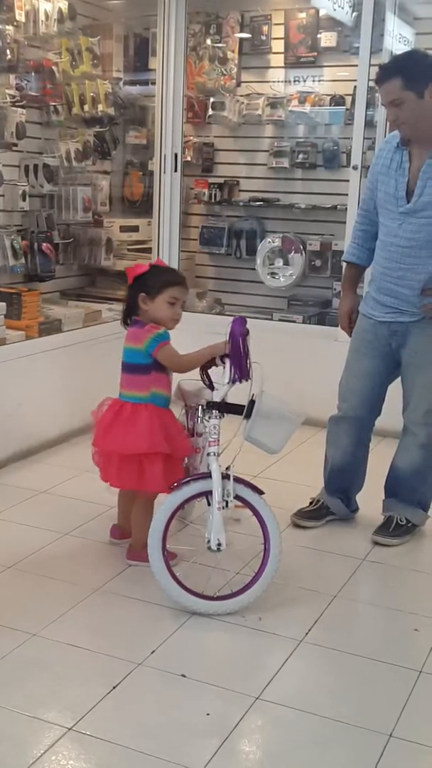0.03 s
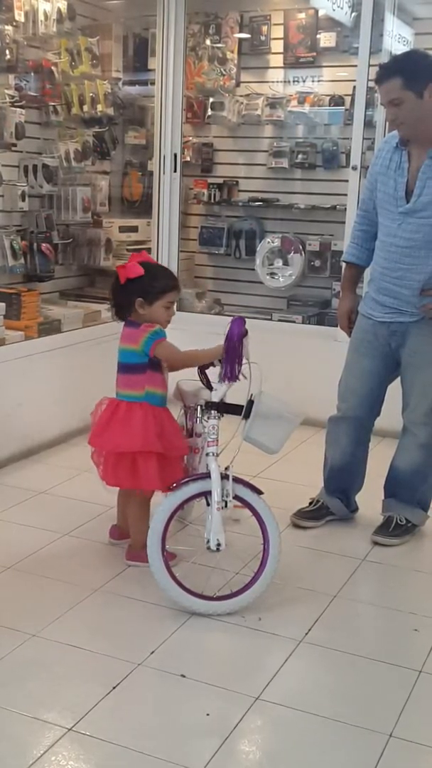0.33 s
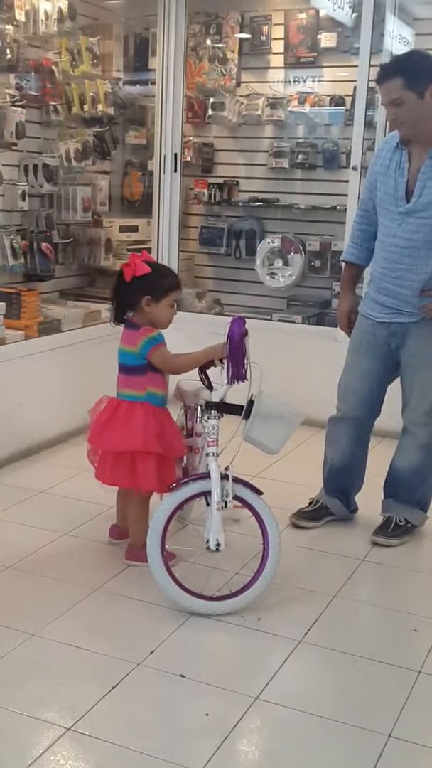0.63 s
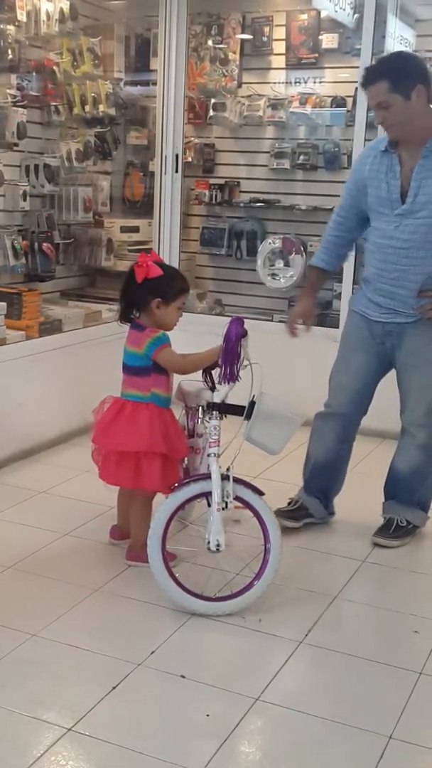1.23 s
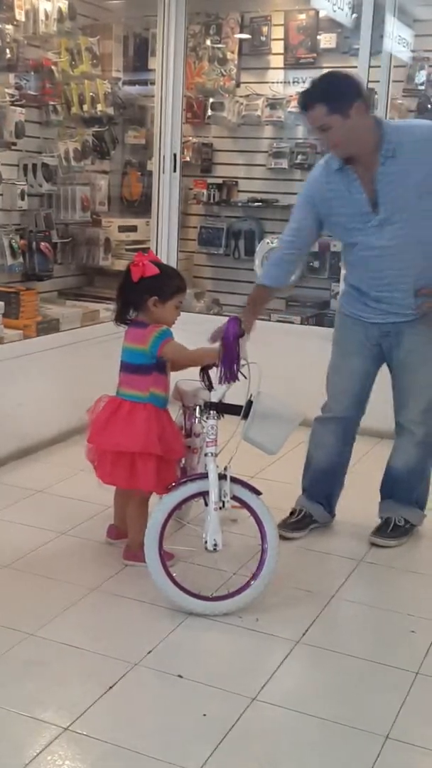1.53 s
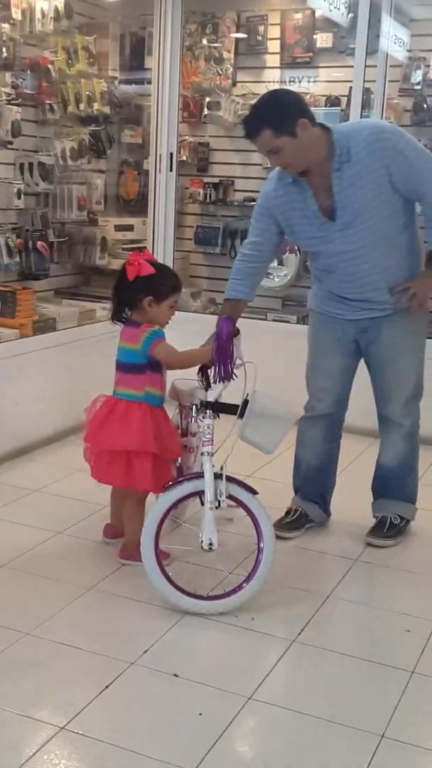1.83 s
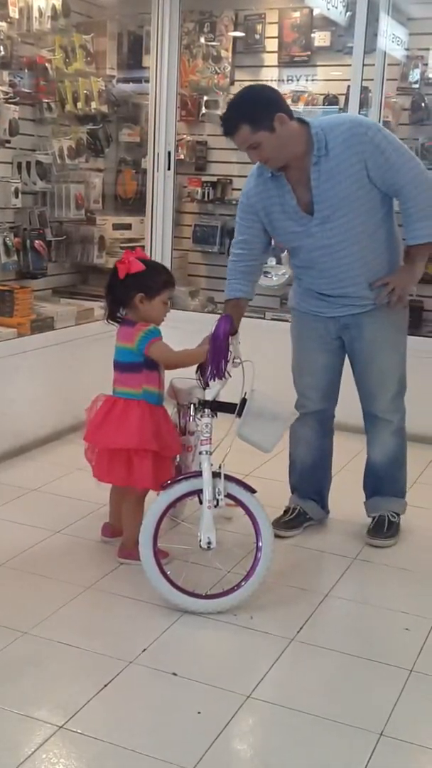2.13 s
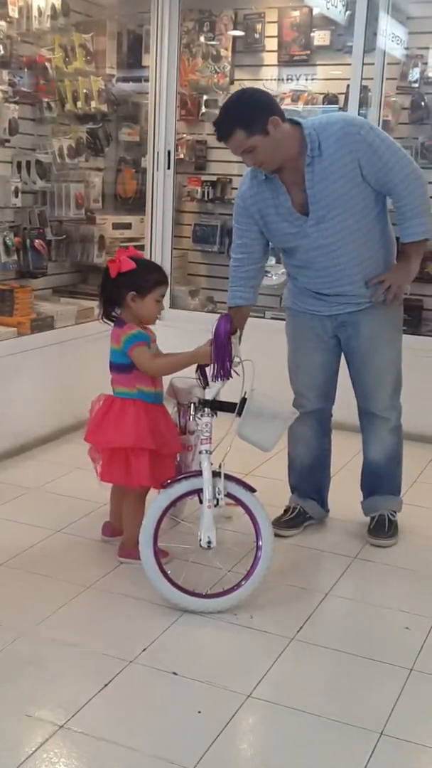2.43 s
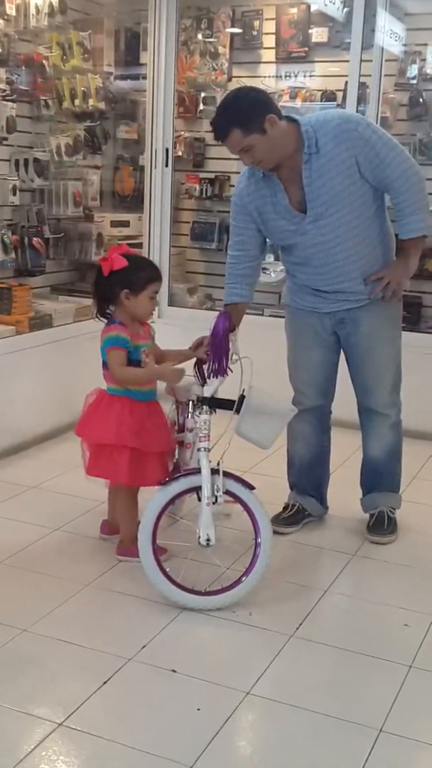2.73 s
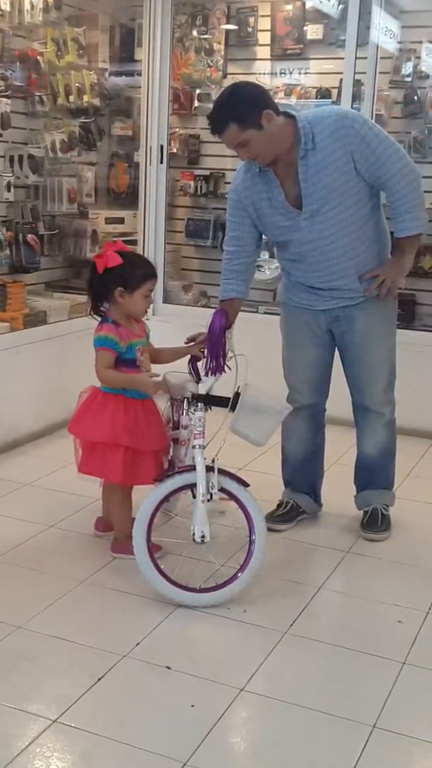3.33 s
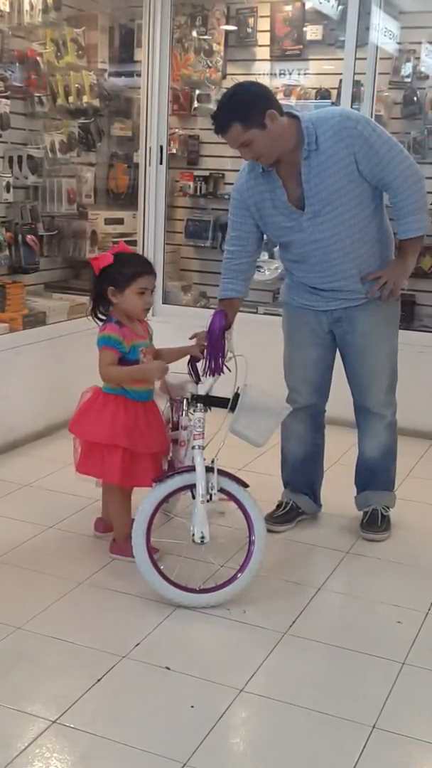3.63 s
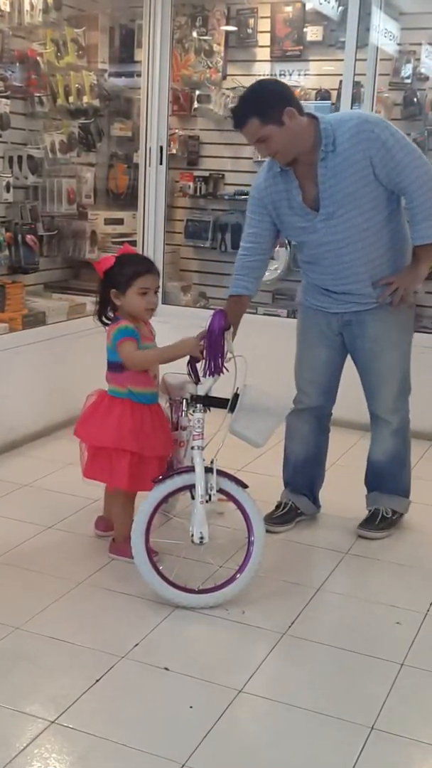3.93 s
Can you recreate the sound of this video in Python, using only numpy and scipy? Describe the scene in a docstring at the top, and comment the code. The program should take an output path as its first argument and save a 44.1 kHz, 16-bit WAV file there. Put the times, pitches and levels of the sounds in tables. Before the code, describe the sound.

A bicycle bell's lever clacks a few times over steady ventilation in a tiled shop. Then the bell gives two quick, bright rings with clattering gears, and its tone lingers while the background hum turns quieter.

```python
"""Bicycle bell in a tiled shop

Ventilation rumbles and hums throughout. The lever of a small rotary bell clacks a few times, then
the bell is rung twice: whirling hammers strike the steel dome in quick runs over a clatter of gears.
An automatic gain control turns everything down once the bell rings."""
import sys
import numpy as np
from scipy import signal
from scipy.fft import rfft, irfft
from scipy.io import wavfile

SR = 44100
rng = np.random.default_rng(int(sys.argv[2]) if len(sys.argv) > 2 else 0)


def transcribe(u):
    """Save the signal u as a 16-bit wav file named by the first command-line argument.

    u: samples, shape (n,) or (channels, n), limited to [-1, 1]; the rate is SR.
    q: integer samples, one column per channel.
    """
    v = np.clip(np.atleast_2d(u).T, -1, 1)
    q = np.round(v * 32767).astype(np.int16)
    wavfile.write(sys.argv[1], SR, q)


N = 176400
TIME = np.arange(N) / SR


def from_db(db):
    """Decibels to gain."""
    return 10 ** (np.asarray(db) / 20)


def at_hz(points, hz):
    """Read a table on a log-frequency axis."""
    freqs, values = np.transpose(points)
    return np.interp(np.log(np.maximum(hz, 1)), np.log(freqs), values)


def pan(lean_db):
    """Constant-power stereo gains; a positive lean is to the left."""
    gains = from_db(np.array([[.5], [-.5]]) * lean_db)
    return gains / np.sqrt(np.mean(gains ** 2, axis=0))


def smooth(x, seconds):
    """One-pole average."""
    pole = np.exp(-1 / (seconds * SR))
    return signal.lfilter([1 - pole], [1, -pole], x)


def drift(rate_hz):
    """Slow random wander, spread 1."""
    slow = irfft(rfft(rng.standard_normal(N)) / (1 + (np.fft.rfftfreq(N, 1 / SR) / rate_hz) ** 2))
    return slow / slow.std()


def waver(rate_hz):
    """Complex wander that moves a tone's level and phase."""
    return drift(rate_hz) + 1j * drift(rate_hz)


def impulses(starts, sizes):
    """Impulses of given sizes at given times."""
    return np.bincount((starts * SR).astype(int), sizes, N)[:N]


def ring_down(starts, db, t60):
    """Amplitude of something that gains energy at each blow and loses it steadily."""
    retained = from_db(-60 / (t60 * SR)) ** 2
    energy = signal.lfilter([1], [1, -retained], impulses(starts, from_db(db) ** 2) + 1e-18)
    return np.sqrt(energy)


def colour(x, spectrum, lean):
    """Minimum-phase EQ with a left-right lean."""
    hz = np.fft.rfftfreq(2 * N, 1 / SR)
    cepstrum = irfft(np.log(from_db(at_hz(spectrum, hz)) * pan(at_hz(lean, hz))))
    cepstrum[:, 1:N] *= 2
    cepstrum[:, N + 1:] = 0
    return irfft(rfft(x, 2 * N) * np.exp(rfft(cepstrum)))[:, :N]


# Tone of the moving air. Each row: frequency in Hz, relative level in dB.
AIR_EQ = [(15, -49), (25, -24.5), (146, -2), (237, -1), (637, -11), (709, -5), (790, -11), (1460, -12.5),
          (1580, -14.5), (1960, -14), (2630, -16.5), (6200, -17.5), (8550, -28), (13800, -46), (15000, -28)]
# Its stereo width. Each row: frequency in Hz, left-right correlation.
AIR_LIKENESS = [(130, 0.98), (290, 0.92), (640, 0.45), (1400, 0), (3000, 0)]
# Its balance. Each row: frequency in Hz, leftward lean in dB.
AIR_LEAN = [(100, 1.5), (700, 0.5), (1300, 5.5), (2400, 9.5), (6000, 11.5), (8300, 0), (12000, -13)]
# Fan tones. Each row: pitch in Hz, level in dB.
FAN_TONES = [(145, -48.5), (683.5, -47), (722, -51), (2573, -58.5), (2729, -56.5)]


def ventilation():
    """Steady air noise, nearly mono in the bass, with wavering fan tones."""
    hz = np.fft.rfftfreq(N, 1 / SR)
    mid, side = rfft(rng.standard_normal((2, N)))
    alike = at_hz(AIR_LIKENESS, hz)
    stereo = mid + np.sqrt((1 - alike) / (1 + alike)) * side * [[1], [-1]]
    air = irfft(stereo * from_db(at_hz(AIR_EQ, hz)) * pan(at_hz(AIR_LEAN, hz)))
    out = from_db(-36.5) * air / air.mean(axis=0).std()
    for tone_hz, db in FAN_TONES:
        wobble = 1 + .43 * waver(rate_hz=1.33)
        out += from_db(db) * np.real(wobble * np.exp(2j * np.pi * tone_hz * TIME))
    return out


# Decay of the room. Each row: frequency in Hz, t60 in seconds.
ROOM_T60 = [(1000, 0.95), (5000, 1), (9000, 0.5), (14000, 0.32)]


def shop_reverb(x, build_s=.005):
    """Diffuse reflections off the tiles, dying faster in the treble."""
    t, tail = TIME[:SR], 0
    edges = np.geomspace(500, 18000, 9)
    for low, high in zip(edges, edges[1:]):
        bandpass = signal.butter(2, [low, high], "band", fs=SR, output="sos")
        band = signal.sosfilt(bandpass, rng.standard_normal((2, SR)))
        tail += band * from_db(-60 * t / at_hz(ROOM_T60, np.sqrt(low * high)))
    tail *= 1 - np.exp(-t / build_s)
    tail /= np.sqrt(np.sum(tail ** 2, axis=1, keepdims=True))
    return signal.fftconvolve(x, tail, axes=1)[:, :N]


# Balance of the clacks and clatter. Each row: frequency in Hz, leftward lean in dB.
CONTACT_LEAN = [(1000, 23), (2500, 5.5), (5400, 12.5), (7500, 0), (9500, -1), (14000, -2.5)]


def contacts(starts, db, spectrum, t60, room_db):
    """Metal on metal: short noise bursts with reverb, coloured by the parts that touch."""
    bursts = ring_down(starts, db, t60) * rng.standard_normal((2, N))
    return colour(bursts + from_db(room_db) * shop_reverb(bursts), spectrum, CONTACT_LEAN)


# Lever clacks. Each row: start in seconds, body accent in dB, edge accent in dB.
CLACKS = [(.138, -2.5, -10.5), (0.153, -1.5, -11), (0.161, -6, -11), (.341, -14, -7.5), (.357, -8.5, -11),
          (.366, -6, -13), (.854, -9, 5.5), (.859, -9, -3), (0.866, 1.5, -3), (0.871, -0.5, -6),
          (0.878, 2, -3), (0.942, -14, 1), (0.954, 2, 1), (.958, -15, -9), (.965, -0.5, -10),
          (.992, -10, -7), (3.787, -2.5, -31)]
# Tone of a clack's body and of its edge. Each row: frequency in Hz, gain in dB.
BODY_EQ = [(700, -11.5), (1300, -8), (1550, -1.5), (1700, -8), (1860, 4.5), (2150, -9.5), (3700, -6),
           (4200, 2.5), (4850, -3.5), (5450, 10.5), (6000, 3.5), (7200, -0.5), (9000, -2.5), (14500, -24)]
EDGE_EQ = [(1500, -17), (4000, -8.5), (7000, -4.5), (8400, 0.5), (9300, -4), (10500, -10.5), (11600, 3.5),
           (13000, -10), (14500, -11)]


def lever():
    """The lever and its housing clack, each time with its own blend of ringing body and bright edge."""
    starts, body_db, edge_db = np.transpose(CLACKS)
    body = contacts(starts, body_db - 16, BODY_EQ, t60=.032, room_db=1)
    edge = contacts(starts, edge_db - 15.5, EDGE_EQ, t60=.025, room_db=4.5)
    return body + edge


def partial(hz, level, phase, lean_db):
    """One ringing mode; it shimmers as reflections add and cancel, more so the higher it lies."""
    depth = .24 * np.sqrt(hz / 5700)
    shimmer = 1 + depth * np.array([waver(rate_hz=12) for _ in range(2)])
    return pan(lean_db) * level * np.real(shimmer * np.exp(1j * (2 * np.pi * hz * TIME + phase)))


# Hammer strikes. Each row: start in seconds, weight in dB (drives the lower modes),
# bite in dB (drives the top modes and the clatter).
STRIKES = [(2.65, -2.5, -0.5), (2.678, 8.5, 10.5), (2.697, 0, 3.5), (2.715, -7, -2), (2.751, 11.5, 5),
           (2.778, -6, -3.5), (2.833, 11, 0.5), (2.861, -13, 8), (2.879, 6, 1.5), (2.902, -4, -9),
           (2.936, 7.5, 0), (3.218, 1, 1), (3.242, 3.5, 5), (3.258, 3.5, 7.5), (3.278, 8, 3.5),
           (3.305, 3, 3), (3.335, 8.5, 5), (3.372, -0.5, 3), (3.432, -6, 7), (3.445, 8.5, -6.5),
           (3.467, 6, 3.5), (3.535, -10, -12)]
# Modes of the dome, mostly in beating pairs. Each row: pitch in Hz, relative level in dB,
# t60 in seconds, swell in seconds, leftward lean in dB, right channel's phase lead in radians.
DOME_MODES = [(1432.7, -32, 1.05, .04, 7, -1.4), (1436.3, -35, 1.05, .04, 7, -1.4),
              (3297.5, -30, 3.8, .03, -2, 1), (3308.5, -23, 3.8, .03, 6, -2.1),
              (5523, -35, .6, .01, 8, 1.5), (5639, -16.5, 1.25, .02, 9, 1.0), (5697, -8, 1.3, .015, 9, 2.4),
              (8463, -19.5, .7, .002, -4, 1.8), (8594, -10.5, .85, .002, -2, 1.9),
              (8683, -27, .6, .002, 0, 1.5), (11797, -18.5, .5, .002, -4, 1.6),
              (12004, -13.5, .52, .002, 4, 1.5)]
# Hammers landing against the vibration briefly choke the ring. Each entry: time in seconds.
CHOKES = [2.865, 3.43, 3.51]
# A faint partial left ringing as the lever is let go: start in seconds, pitch in Hz, level in dB,
# t60 in seconds, swell in seconds, leftward lean in dB.
AFTER_RING = (3.469, 4744, -23, .85, .04, 10)


def dome(trim_db=-1.8, bite_above_hz=7000, jolt_s=2.4e-5, choke_db=10.5, choke_s=.011, room_db=-9):
    """Each strike feeds the steel dome's modes and jolts their phase; between runs they ring and beat."""
    starts, weight_db, bite_db = np.transpose(STRIKES)
    jolts = impulses(starts, jolt_s * rng.standard_normal(len(starts)))
    shift_s = smooth(np.cumsum(jolts), seconds=.0015)
    ring = 0
    for hz, mode_db, t60, swell_s, lean_db, lead_rad in DOME_MODES:
        drive_db = bite_db if hz > bite_above_hz else weight_db
        drive_db = drive_db + rng.standard_normal(len(starts))
        level = smooth(ring_down(starts, trim_db + mode_db + drive_db, t60), swell_s)
        phase = 2 * np.pi * hz * shift_s + lead_rad * np.array([[0], [1]])
        ring += partial(hz, level, phase, lean_db)
    choke = sum(np.exp(-((TIME - at) / choke_s) ** 2) for at in CHOKES)
    ring *= from_db(-choke_db * choke)
    start, hz, db, t60, swell_s, lean_db = AFTER_RING
    level = smooth(ring_down(np.array([start]), [db], t60), swell_s)
    ring += partial(hz, level, 0, lean_db)
    return ring + from_db(room_db) * shop_reverb(ring)


# Tone of the hammers and gears. Each row: frequency in Hz, gain in dB.
CLATTER_EQ = [(700, -64), (1200, -22.5), (1600, -11), (1850, -8.5), (2500, -17.5), (2900, -10.5),
              (3600, -9), (4000, -11), (4350, 3.5), (4900, -6.5), (5300, -5.5), (6000, 0.5), (6600, -2.5),
              (7300, 1.5), (8000, -3.5), (8700, 3.5), (9500, -4), (10500, -14), (11900, 1), (13000, -13),
              (14500, -15.5)]


def clatter():
    """Hammers and gears rattle at every strike on the dome."""
    starts, _, bite_db = np.transpose(STRIKES)
    return contacts(starts, bite_db - 10, CLATTER_EQ, t60=.042, room_db=6.5)


# Dips in the ventilation bed. Each row: start in seconds, end in seconds, depth in dB.
BED_DIPS = [(2.706, 2.969, 12.5), (3.27, 3.489, 17.5)]


def bed_dips(fade_s=.018):
    """Gain of the ventilation, which sinks briefly under each ring."""
    dip_db = 0
    for start, end, depth_db in BED_DIPS:
        inside_s = np.minimum(TIME - start, end - TIME)
        dip_db += depth_db * np.clip(inside_s / fade_s + .5, 0, 1)
    return from_db(-dip_db)


def scene():
    """The bell's works, dome and lever over the ventilation bed."""
    return clatter() + dome() + lever() + bed_dips() * ventilation()


def record(dry, threshold_db=-20.5, max_duck_db=11.5, attack_s=.0062, release_db_per_s=1.5, ceiling=.95):
    """Gain control that ducks fast and recovers slowly, then a soft clip and a steep treble cut."""
    power = smooth(np.mean(dry ** 2, axis=0), seconds=.0052)
    over_db = np.maximum(10 * np.log10(power + 1e-12) - threshold_db, 0)
    recovery_db = release_db_per_s * TIME
    duck_db = np.maximum.accumulate(over_db + recovery_db) - recovery_db
    ducked = dry * from_db(-smooth(np.minimum(duck_db, max_duck_db), attack_s))
    rounded = ducked / (1 + (ducked / ceiling) ** 8) ** (1 / 8)
    return signal.sosfilt(signal.cheby2(16, 70, 15400, fs=SR, output="sos"), rounded)


dry = scene()
out = record(dry)
transcribe(out)
```